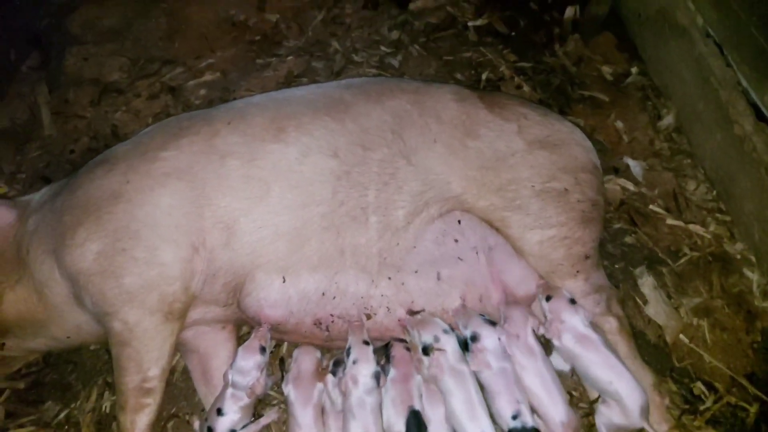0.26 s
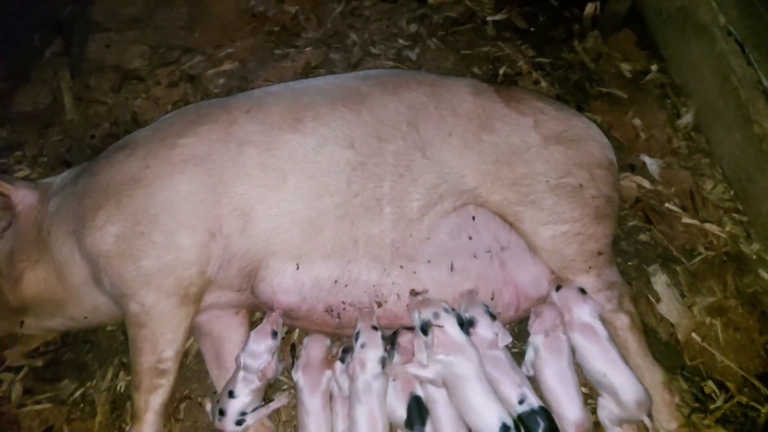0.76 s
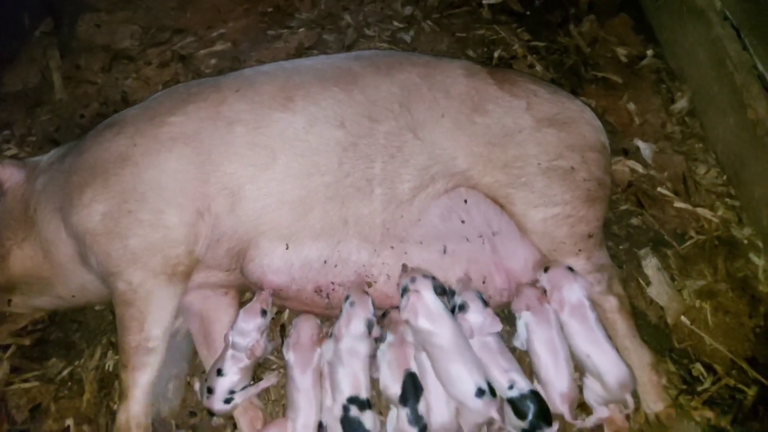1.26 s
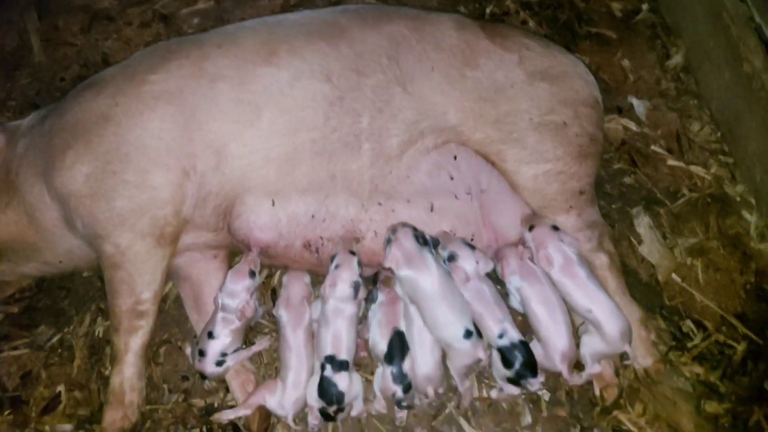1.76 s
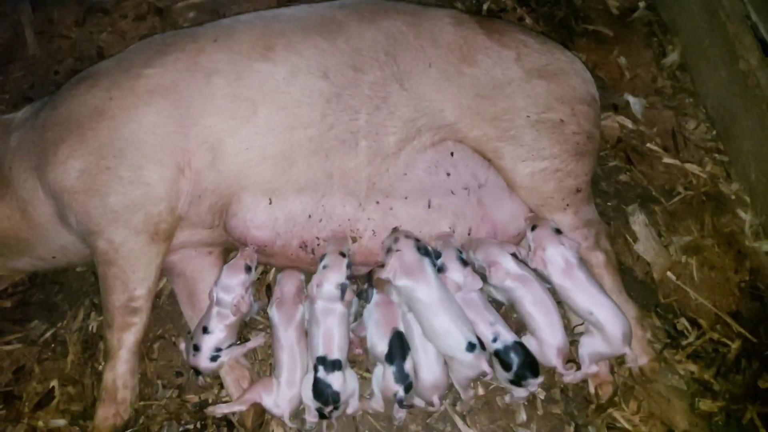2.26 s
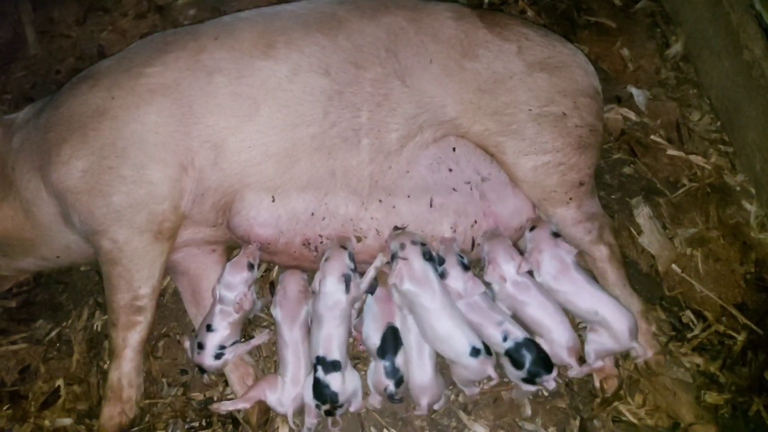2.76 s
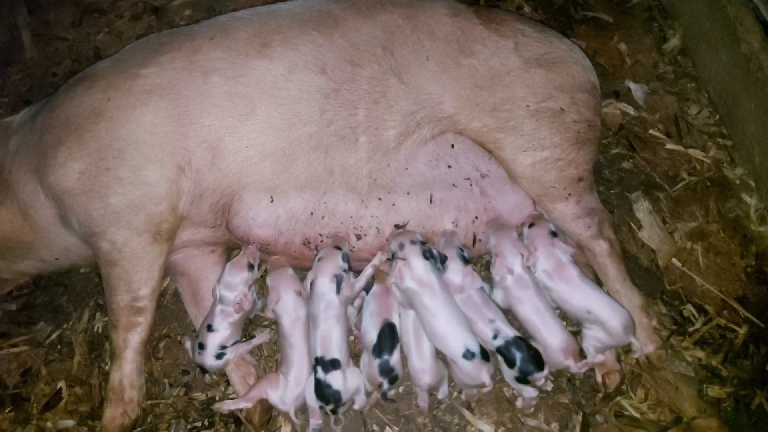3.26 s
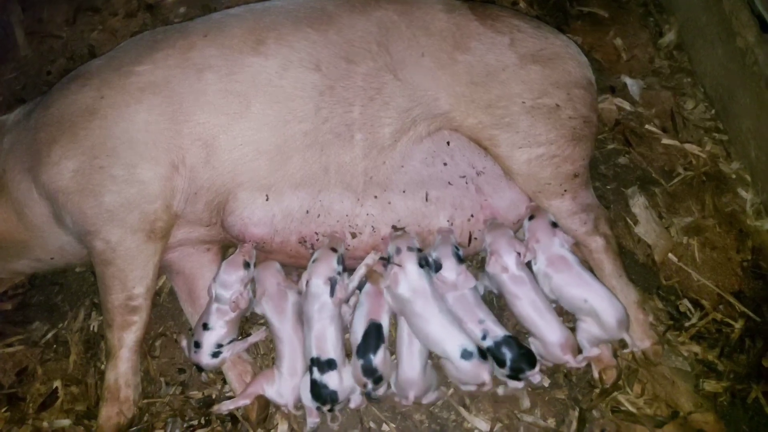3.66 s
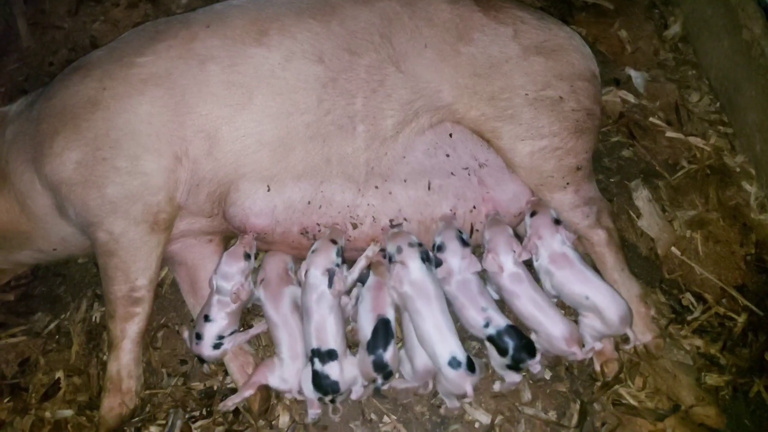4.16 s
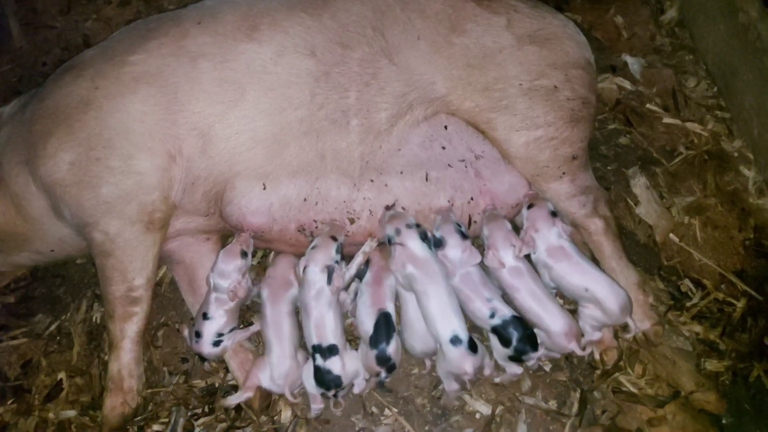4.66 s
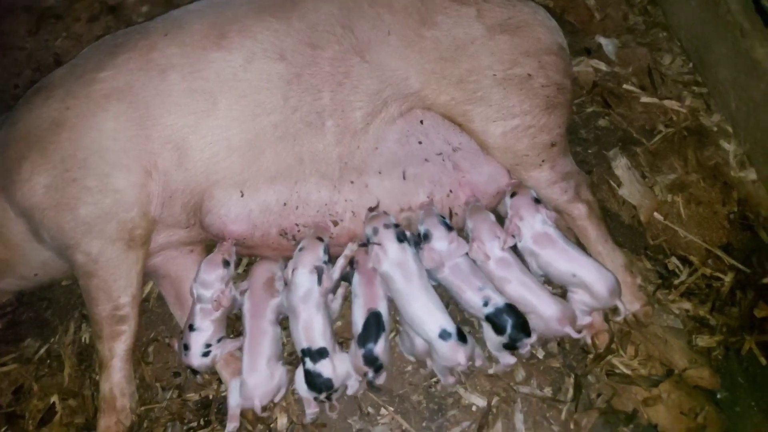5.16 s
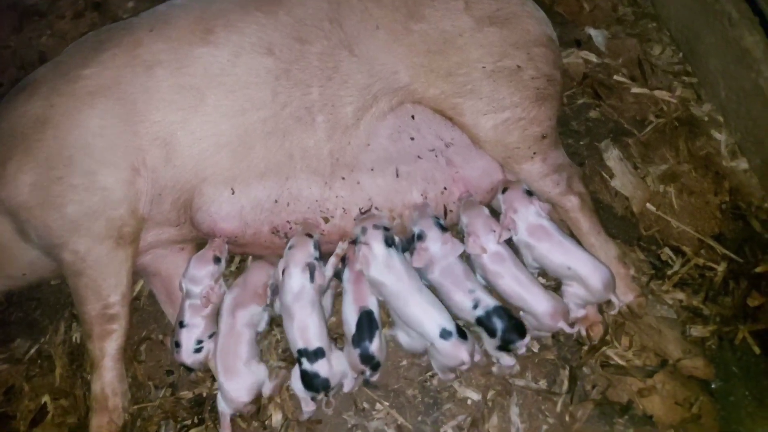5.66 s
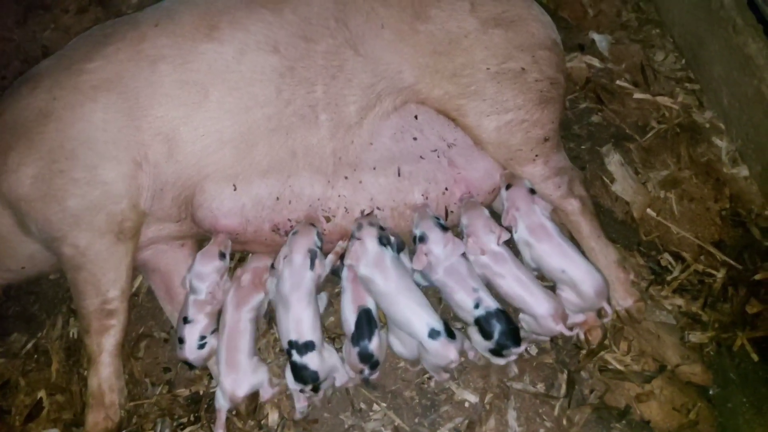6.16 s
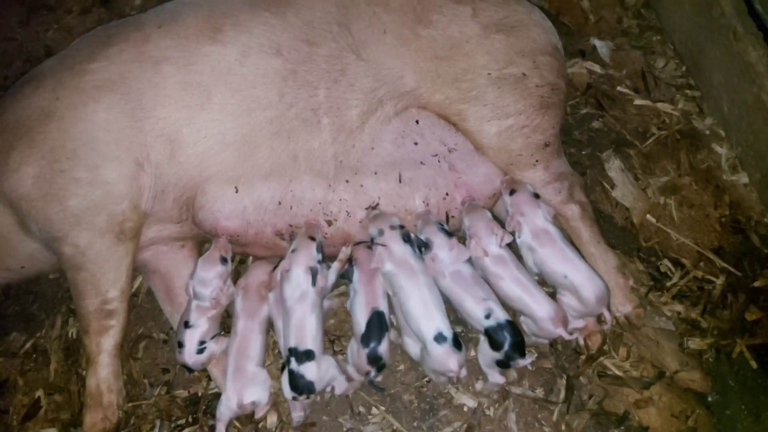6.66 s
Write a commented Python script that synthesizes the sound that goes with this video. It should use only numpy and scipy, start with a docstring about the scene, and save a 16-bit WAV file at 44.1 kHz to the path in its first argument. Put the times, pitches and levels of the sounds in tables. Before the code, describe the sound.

In a small sty at night, a sow close to the microphone gives five low, rattling grunts, each a few slow throat pulses with a short boxy ring. Between and under them piglets squeak faintly and breathily, smack at the teats and stir crackling straw. A small pop and a sharp smack come late. Crickets buzz brightly throughout, over soft air and faint hum.

```python
"""In a small sty at night a sow lies nursing and gives five low grunts, each a few slow pulses of the throat
that excite echoes and ringing modes of the pen. Her piglets squeak thinly as gliding narrow-band noise,
smack at the teats in short bursts of ringing noise, and stir straw that crackles in random grains.
Outside, bush crickets buzz in overlapping bouts of toothed wing strokes, with steady bright lines within
the buzz, over softly coloured air noise with a faint hum and a falling drone."""
import sys
import numpy as np
from scipy import signal
from scipy.fft import rfft, irfft
from scipy.io import wavfile
from scipy.ndimage import uniform_filter1d

SR = 44100
rng = np.random.default_rng(int(sys.argv[2]) if len(sys.argv) > 2 else 0)


def file_out(sig):
    """Save sig as 16-bit WAV at sys.argv[1]."""
    # one column per channel
    cols = np.atleast_2d(sig).T
    # limit, then scale
    lim = np.clip(cols, -1, 1)
    pcm = np.round(lim * 32767).astype(np.int16)
    wavfile.write(sys.argv[1], SR, pcm)


N = 304731
T = np.arange(N) / SR  # time in seconds


def undb(db):
    """Amplitude ratio: twenty decibels are a factor of ten."""
    return 10 ** (np.asarray(db) / 20)


def unit(x):
    """Normalisation to a root-mean-square of 1."""
    return x / np.sqrt(np.mean(x ** 2) + 1e-18)


def pan(db):
    """Interaural level difference: left above right by db, as a column of two gains."""
    return undb(np.array([[db], [-db]]) / 2)


def colour(x, points):
    """Spectral shaping: filter by points of (Hz, dB), joined on a log-frequency axis."""
    hz, db = np.transpose(points)
    f = np.fft.rfftfreq(x.shape[-1], 1 / SR)
    gain = undb(np.interp(np.log(f + 1), np.log(hz), db))
    return irfft(rfft(x) * gain, x.shape[-1])


def band(x, hz, width_hz):
    """Simple resonance: one resonator with gain 1 at its centre."""
    hz = min(hz, .45 * SR)
    b, a = signal.iirpeak(hz, hz / width_hz, fs=SR)
    return signal.lfilter(b, a, x)


def clicks(times, sizes):
    """Impulse train: each impulse is shared between its two nearest samples."""
    inside = (times >= 0) & (times < (N - 2) / SR)
    whole, part = np.divmod(times[inside] * SR, 1)
    i, size = whole.astype(int), sizes[inside]
    return np.bincount(i, size * (1 - part), N) + np.bincount(i + 1, size * part, N)


def ring(x, response):
    """Convolution: a linear system answers every sample with its impulse response."""
    return signal.fftconvolve(np.atleast_2d(x), response, axes=1)[:, :N]


def fading(t60):
    """Diffuse decay: a second of two-channel noise falling 60 dB in t60 seconds, with unit energy."""
    tail = rng.standard_normal((2, SR)) * undb(-60 * T[:SR] / t60)
    return tail / np.sqrt(np.sum(tail ** 2) / 2)


def spread(likeness):
    """Interaural correlation: two noises with the given likeness, from a shared and an opposed part."""
    mid, side = rng.standard_normal((2, N))
    c = np.clip(likeness, -1, 1)
    opposed = side * np.array([[1], [-1]])
    return unit(np.sqrt(1 + c) * mid + np.sqrt(1 - c) * opposed)


def in_sty(x, wet_db, t60):
    """Reverberation: direct sound plus diffuse ring, scaled for nearly unchanged loudness."""
    return (x + undb(wet_db) * ring(x, fading(t60))) / np.hypot(1, undb(wet_db))


def whistles(rows, settle_s=0.0594, edge=0.2, flutter_db=0):
    """Narrow-band modulation: slow noise wavers a carrier that glides exponentially to its last pitch."""
    out = np.zeros(N)
    for start, end, first_hz, last_hz, width_hz, db in rows:
        i = np.flatnonzero((T > start) & (T < end))
        noise = rng.standard_normal((3, 3 * SR))
        age = T[i] - start
        hz = last_hz + (first_hz - last_hz) * np.exp(-age / settle_s)
        phase = 2 * np.pi * np.cumsum(hz) / SR
        slow = signal.sosfilt(signal.butter(2, width_hz / 2, fs=SR, output="sos"), noise[:2])
        # skip the filter's first quarter second; long notes reuse the noise
        a, b = slow[:, (i - i[0] + SR // 4) % noise.shape[1]]
        wander = unit(uniform_filter1d(np.resize(noise[2], len(i)), SR // 100))
        tone = undb(flutter_db * wander) * (a * np.cos(phase) + b * np.sin(phase))
        envelope = np.sin(np.pi * age / (end - start)) ** edge
        out[i] += undb(db) * envelope * unit(tone)
    return out


def swell(times, width_s):
    """Gaussian envelope: a smooth bump of height 1 around each time."""
    return sum(np.exp(-((T - s) / width_s) ** 2) for s in times)


def walk(per_s):
    """Band-limited fluctuation: smooth random wandering with an rms of 1."""
    step = int(SR / per_s)
    return unit(uniform_filter1d(np.repeat(rng.standard_normal(200), step)[:N], step))


# Five grunts. Each row: start in seconds, strongest flap in seconds, end in seconds, flap period in ms,
# slowing in ms per flap, build-up in dB, fade in dB, level in dB, rasp in dB relative to the flap,
# chest thump in dB relative to the common chest gain.
GRUNT_ROWS = [(.39, .4803, .57, 47.2, 2.7, 10, 4, -6, -24, 3.5),
              (1.38, 1.5323, 1.595, 42, 2, 3.5, 7, -7, -30, -2.5),
              (2.2, 2.3402, 2.405, 47, 4, 2.8, 11, -4.3, -27, 0),
              (3.73, 3.8148, 3.945, 47, 3.3, 12, 4, -5.3, -22.5, 2),
              (5.09, 5.1797, 5.29, 40.4, 3.1, 4.4, 1.2, -6.5, -24, -1)]
# Colour of the rasp in the snout. Each row: frequency in Hz, relative level in dB.
RASP_SPECTRUM = [(300, -20), (700, 5), (1100, 3), (1350, -8), (1600, -1.5), (1800, -10), (2050, 6),
                 (2450, -6.5), (2850, 3), (3100, -8), (3450, -0.5), (4300, -5.5), (6000, -11), (12000, -32)]


def sow(flow_db=-39.5, rasp_fall_db=3, rasp_s=0.036, chest_db=38, chest_hz=78, chest_width_hz=52):
    """Source and filter: slack folds flap about 22 times a second, slowing; air rasps after each flap."""
    flaps, rasps, flow, depth_db = np.zeros((4, N))
    for start, peak, end, period_ms, slowing_ms, build_db, fade_db, db, rasp_db, deep_db in GRUNT_ROWS:
        k = np.arange(-3, 3)  # flap number, 0 at the strongest
        times = peak + (period_ms * k + slowing_ms * k ** 2 / 2) / 1000
        loss_db = np.where(k < 0, build_db * k ** 2, fade_db * np.abs(k) ** 1.6)
        sizes = undb(db - loss_db) * (times > start) * (times < end)
        flaps += clicks(times, sizes)
        rasps += clicks(times, sizes * undb(rasp_db - rasp_fall_db * k))
        depth_db[T > start] = deep_db
        flow += undb(db) * np.sin(np.pi * np.clip((T - start) / (end - start), 0, 1)) ** 2
    drive = flaps + undb(flow_db) * flow * rng.standard_normal(N)
    # the flap response peaks 10 ms in, so the drive is moved that much earlier
    voice = ring(np.roll(drive, -SR // 100), flap_response())
    # the big body answers each flap with a slow thump
    thump = band(band(drive, chest_hz, chest_width_hz), chest_hz, chest_width_hz)
    chest = undb(chest_db + depth_db) * thump
    voice = signal.sosfilt(signal.butter(4, 42, "high", fs=SR, output="sos"), voice + chest)
    puff = np.exp(-T[:SR] / rasp_s)
    return voice + ring(rasps, puff[None]) * unit(colour(spread(0.36), RASP_SPECTRUM)) * pan(0.55)


# Echoes off floor and walls. Each row: delay on the left in ms, delay on the right in ms, level in dB.
WALL_ECHOES = [(2.1, 2.4, -14), (3.4, 3.6, -15), (6.4, 4.9, -10), (9.1, 9.1, -16), (11.8, 12.1, -12),
               (14, 13.9, -12)]
# Ringing of throat and pen. Each row: frequency in Hz, 60 dB decay time in seconds, level in dB.
RESONANT_MODES = [(94.2, 0.29, -17.5), (204.6, 0.21, -35), (237.5, 0.22, -17.5), (320.1, 0.21, -9.5),
                  (357.7, 0.15, -12), (454.7, 0.12, -13), (502.7, 0.24, -20), (563.3, 0.33, -26.5),
                  (614, 0.36, -28), (655, 0.25, -28), (786, 0.12, -19.5), (920, 0.2, -40), (1030, 0.2, -25),
                  (1112, 0.13, -24)]


def flap_response(direct_db=-1, pulse_hz=480, lag_ms=0.28, right_db=-1.5, diffuse_db=-11, tail_db=-19,
                  build_cycles=0.17, mode_spread_rad=0.26):
    """Impulse response: a short pressure pulse, its echoes, ringing modes and a faint long tail."""
    def pulse(t):
        """Ricker wavelet: a pressure peak between two shallow troughs."""
        a = (np.pi * pulse_hz * t) ** 2
        return (1 - 2 * a) * np.exp(-a)

    t = T[:SR] - 1 / 100 - np.array([[0], [lag_ms]]) / 1000
    out = undb(direct_db) * pulse(t)
    for left_ms, right_ms, db in WALL_ECHOES:
        out = out + undb(db) * pulse(t - np.array([[left_ms], [right_ms]]) / 1000)
    age = np.maximum(t, 0)
    for hz, t60, db in RESONANT_MODES:
        build = 1 - np.exp(-age * hz / build_cycles)  # low modes take longer to fill
        # a standing wave meets the two sides out of step
        shift = mode_spread_rad * rng.choice([-1, 1]) * np.array([[1], [-1]])
        out = out + build * undb(db - 60 * age / t60) * np.cos(2 * np.pi * hz * t + shift)
    scatter = undb(diffuse_db) * fading(.14) + undb(tail_db) * fading(1.1)
    out = out + signal.fftconvolve(pulse(t), scatter, axes=1)[:, :SR]
    return out * undb([[0], [right_db]])


def piglets(squeak_db=-1):
    """Superposition: squeaks, murmurs, crackling straw and the noises of suckling add linearly."""
    calls = in_sty(squeaks(), wet_db=-5, t60=.28)
    return calls * undb(squeak_db) * pan(-0.26) + murmurs() + straw() + suckling()


# Rising squeaks. Each row: start in seconds, end in seconds, top pitch in Hz, relative level in dB.
SQUEAK_ROWS = [(-.3, .14, 2890, -51), (1.151, 1.313, 2230, -50), (1.513, 1.64, 2680, -43),
               (1.609, 1.862, 2983, -44), (2.1, 2.293, 2660, -40), (2.39, 2.504, 2650, -45),
               (2.49, 2.63, 2170, -44), (2.699, 3.09, 2718, -49.5), (3.317, 3.691, 2700, -54.5),
               (3.989, 4.245, 2640, -56), (4.371, 4.49, 2450, -46.5), (4.43, 4.73, 3000, -49),
               (4.729, 4.882, 2650, -48), (4.9, 5.15, 2360, -41), (5.33, 5.679, 2570, -49.5),
               (5.369, 5.572, 3250, -51), (5.623, 6.027, 2870, -55.5), (6.123, 6.327, 2645, -52.5),
               (6.661, 6.9, 2480, -54.5)]
# Short level peeps. Each row: start in seconds, pitch in Hz, relative level in dB.
PEEP_ROWS = [(2.07, 1886, -46.5), (2.34, 1575, -42), (3.131, 2060, -49), (3.915, 1780, -43.5),
             (4.871, 1572, -44), (6.689, 1777, -46.5)]


def squeaks(core_db=-3.5, hoarse_db=-2, breath_db=-6, flutter_db=3, edge=0.41, sweep_per_db=.027,
            level_squeak_db=-57, rise_share=.25, squeak_width_hz=180, peep_s=0.09, peep_width_hz=154):
    """Tone plus turbulence: a clear whistle, a hoarse strand and wider rushing air form each call."""
    def call(start, end, first_hz, top_hz, width_hz, db):
        """Bandwidth and clarity: the narrower the strand, the purer it sounds."""
        strands = [(1 / 4, core_db), (1, hoarse_db), (3, breath_db)]  # (share of the width, dB)
        rows = [(start, end, first_hz, top_hz, share * width_hz, db + strand_db)
                for share, strand_db in strands]
        return whistles(rows, settle_s=rise_share * (end - start), edge=edge, flutter_db=flutter_db)

    sound = sum(call(start, start + peep_s, hz, hz, peep_width_hz, db) for start, hz, db in PEEP_ROWS)
    for start, end, top_hz, db in SQUEAK_ROWS:
        # the harder a piglet pushes, the further below its top pitch a squeak starts
        sweep = np.clip(sweep_per_db * (db - level_squeak_db), 0, .5)
        sound = sound + call(start, end, top_hz * (1 - sweep), top_hz, squeak_width_hz, db)
    return signal.sosfilt(signal.butter(6, 3150, fs=SR, output="sos"), sound)


# The loudest smacks at the teats. Each row: time in seconds, level in dB, centre in Hz.
SMACK_ROWS = [(.2488, -29.5, 7000), (1.2267, -34.5, 8400), (1.5399, -37, 13200), (2.281, -30, 8000),
              (2.6544, -33, 13000), (2.945, -33, 12200), (3.2086, -38, 12700), (3.304, -39, 13800),
              (4.433, -37.5, 12700), (5.346, -32.5, 7900), (5.633, -35, 8000), (5.695, -18, 11500),
              (6.31, -23.5, 7060)]
# Broad noise bursts: soft scuffs, and the slower fade of the loudest smack.
# Each row: time in seconds, level in dB, centre in Hz.
BROAD_BURST_ROWS = [(0.019, -42, 1850), (.899, -50, 2180), (2.279, -36.5, 2840), (3.268, -38, 4400),
                    (3.551, -51.5, 990), (5.621, -42.5, 1890), (5.697, -38, 5000)]


def suckling(wet_db=-4, t60=0.14, scatter_db=3, faint_per_s=4, faint_db=-42):
    """Transient excitation: a few loud smacks among many faint ones, broad soft bursts and a pop."""
    chance = rng.uniform(0, 1, (int(faint_per_s * N / SR), 3))
    faint = [(when * N / SR, faint_db + scatter_db * (2 * size - 1), 7000 + 6500 * tone)
             for when, size, tone in chance]
    smacks = sum(smack(s, db, hz, width_hz=0.77 * hz, decay_s=0.0068, pan_db=-8.5)
                 for s, db, hz in list(SMACK_ROWS) + faint)
    broad = sum(smack(s, db, hz, width_hz=hz, decay_s=0.039, pan_db=6) for s, db, hz in BROAD_BURST_ROWS)
    # a teat pops out of a mouth
    pop = smack(5.0145, -17, 2030, width_hz=370, decay_s=0.0049, pan_db=-3)
    return in_sty(smacks + broad + pop, wet_db, t60)


def smack(time, db, hz, width_hz, decay_s, pan_db, rise_s=0.0014):
    """Damped resonance: a quick burst of noise, filtered twice by one resonator, dies away."""
    age = T[:SR // 4]
    noise = band(band(rng.standard_normal(len(age)), hz, width_hz), hz, width_hz)
    burst = unit(noise) * np.exp(-age / decay_s) * (1 - np.exp(-age / rise_s))
    return np.pad(burst, (int(time * SR), N))[:N] * undb(db) * pan(pan_db)


# Soft murmurs, and the pen's faint ringing after two grunts.
# Each row: start in seconds, end in seconds, resonance in Hz, level in dB.
MURMUR_ROWS = [(-.05, 0.211, 760, -45.5), (-.03, .2, 340.7, -48), (0.736, 0.826, 303, -44.5),
               (1.84, 1.946, 293, -37.5), (2.45, 2.75, 400, -55), (3.12, 3.314, 743, -52),
               (3.98, 4.33, 340, -55), (6.539, 6.617, 250, -55)]
# Deep rumbles. Each row: start in seconds, end in seconds, frequency in Hz, level in dB.
RUMBLE_ROWS = [(1.381, 1.45, 93, -35), (1.921, 2.25, 66.3, -47.5), (4.329, 4.66, 66.4, -46.5),
               (5.3, 5.453, 68.6, -46)]


def murmurs(width_share=.2, upper_ratio=1.95, upper_db=-13, rumble_width_hz=16.5):
    """Paired resonances: murmurs and faint pen ringing sound a resonance and a weaker one above it;
    rumbles are single deep bands."""
    rows = [(start, end, ratio * hz, ratio * hz, width_share * ratio * hz, db + part_db)
            for start, end, hz, db in MURMUR_ROWS
            for ratio, part_db in [(1, 0), (upper_ratio, upper_db)]]
    rows += [(start, end, hz, hz, rumble_width_hz, db) for start, end, hz, db in RUMBLE_ROWS]
    return in_sty(whistles(rows, edge=0.57), wet_db=-7, t60=0.22) * pan(1)


# Colour of the straw. Each row: frequency in Hz, relative level in dB.
STRAW_SPECTRUM = [(1000, -11), (2500, 4.5), (3400, -6), (4500, -12), (8300, -1), (10000, -5.5), (12500, 4),
                  (15500, -10.5)]


def straw(rest_db=-55, heave_db=-51, heave_s=0.094, tug_db=-55, tug_s=0.094, fidget_db=2.5, grain_db=4.2):
    """Shot noise: random grains crackle, more when a grunt heaves the flank or a piglet tugs a teat."""
    when = rng.uniform(0, N / SR, (2, 2500))
    size = np.minimum(rng.exponential(1, (2, 2500)), 5)
    grains = np.array([clicks(w, undb(grain_db * e)) for w, e in zip(when, size)])
    leaky = grains + 0.05 * grains[::-1]  # a little of each side reaches the other
    crackle = unit(colour(ring(leaky, fading(0.11)), STRAW_SPECTRUM))
    heaves = undb(heave_db) * swell([grunt[1] for grunt in GRUNT_ROWS], heave_s)
    tugs = undb(tug_db) * swell([row[0] for row in SMACK_ROWS], tug_s)
    return crackle * (undb(rest_db) + heaves + tugs) * undb(fidget_db * walk(10)) * pan(-0.78)


# Cricket bouts. Each row: start in seconds, end in seconds, settled wing-stroke rate in Hz,
# extra rate at the start in Hz, settled level in dB.
BOUT_ROWS = [(-2, 0.42, 169.7, 15, -34.5), (-3, 1.18, 156.4, 6, -46), (0.74, 4.3, 206.7, 17, -44.5),
             (0.95, 4.24, 152.4, 11, -45), (4, 7.2, 203.5, 12, -48), (5, 6.32, 166, 15, -41.5)]
# Steady bright lines within the crickets' buzz. Each row: start in seconds, end in seconds,
# frequency in Hz, level in dB.
BRIGHT_LINE_ROWS = [(2, 4.9, 5485, -53.5), (1.6, 2.79, 5443, -48), (2.6, 2.7, 6500, -53.5),
                    (2.1, 6.6, 6811, -59.5), (5.7, 6.25, 5560, -51)]
# Colour of the crickets' wings. Each row: frequency in Hz, relative level in dB.
WING_SPECTRUM = [(3000, -73), (3700, -17.5), (4100, -8), (4550, -0.5), (5100, -2.5), (5600, 0.5),
                 (6250, -2), (6900, -6), (7600, -11.5), (9500, -21)]


def crickets(settle_s=.55, far_db=-45.5, waver_db=1.03, unsteady_hz=.25, blur_share=.3, wing_hz=6000,
             wing_width_hz=2600, attack_s=0.37, release_s=0.25, eager_db=7.5, line_width_hz=10):
    """Stridulation: each stroke drags the same file of teeth; a bout starts fast and loud, then settles.
    Foliage scatters part of each song into a hiss, and far singers blur altogether."""
    buzz, blur = 0, np.clip(blur_share, 0, 1)
    for start, end, stroke_hz, extra_hz, db in BOUT_ROWS:
        eager = np.exp(-np.maximum(T - start, 0) / settle_s)
        turns = np.cumsum(stroke_hz + extra_hz * eager + unsteady_hz * walk(14)) / SR
        times = np.interp(np.arange(1, turns[-1]), turns, T)  # one stroke per whole turn
        teeth = ring(clicks(times, np.ones(len(times))), fading(0.056))
        strokes = unit(colour(band(teeth, wing_hz, wing_width_hz), WING_SPECTRUM))
        hiss = unit(colour(spread(0), WING_SPECTRUM))
        song = np.sqrt(1 - blur) * strokes + np.sqrt(blur) * hiss
        gate = np.clip((T - start) / attack_s, 0, 1) * np.clip((end - T) / release_s, 0, 1)
        buzz = buzz + song * gate * undb(db + eager_db * eager)
    far = undb(far_db + waver_db * walk(11)) * unit(colour(spread(0.043), WING_SPECTRUM))
    lines = [(start, end, hz, hz, line_width_hz, db) for start, end, hz, db in BRIGHT_LINE_ROWS]
    return (buzz + far) * pan(-5.0) + whistles(lines, edge=0.18) * pan(2)


# Colour of night air, with its hum. Each row: frequency in Hz, relative level in dB.
AIR_SPECTRUM = [(25, -12), (60, 10), (95, 12), (150, 4.5), (230, -3), (295, 9.5), (350, -1), (600, -5),
                (1300, -12.5), (2500, -14.5), (3400, -17), (8000, -61), (10000, -10.5), (16000, -32)]
# A far, slowly falling drone. Each row: start in seconds, end in seconds, first pitch in Hz,
# last pitch in Hz, width in Hz, level in dB.
DRONE_ROWS = [(-0.33, 1.02, 735, 600, 42, -54)]


def night(air_db=-54, low_hz=700):
    """Diffuse field: still air, alike on both sides in the bass, with a faint hum and a far drone."""
    lows = signal.butter(2, low_hz, fs=SR, output="sos")
    highs = signal.butter(2, low_hz, "high", fs=SR, output="sos")
    air = signal.sosfilt(lows, spread(0.82)) + signal.sosfilt(highs, spread(0.074))
    drone = whistles(DRONE_ROWS, settle_s=0.68, edge=0.62)
    return unit(colour(air, AIR_SPECTRUM)) * undb(air_db) + drone


def scene():
    """Superposition: sow and litter close by, the night around them."""
    return sow() + piglets() + crickets() + night()


def record(dry, dip_hz=10200, dip_width_hz=1800, dip_share=0.3, top_hz=15700):
    """Frequency response: the microphone has a shallow dip in the high treble and cuts the very top."""
    heard = dry - dip_share * band(dry, dip_hz, dip_width_hz)
    return signal.sosfilt(signal.ellip(8, .2, 70, top_hz, fs=SR, output="sos"), heard)


dry = scene()
out = record(dry)
file_out(out)
```